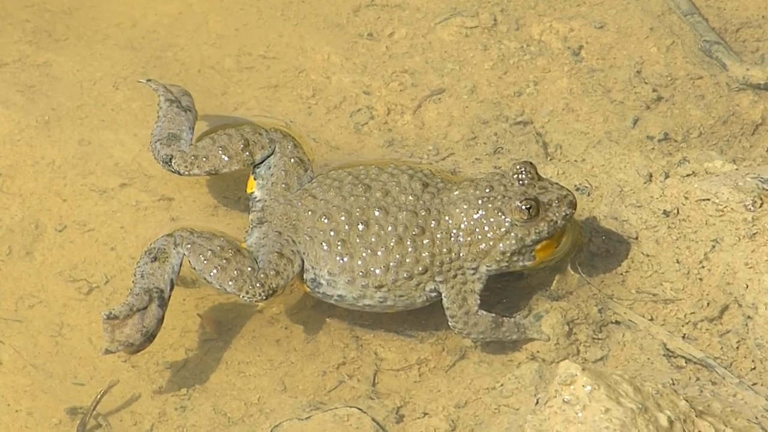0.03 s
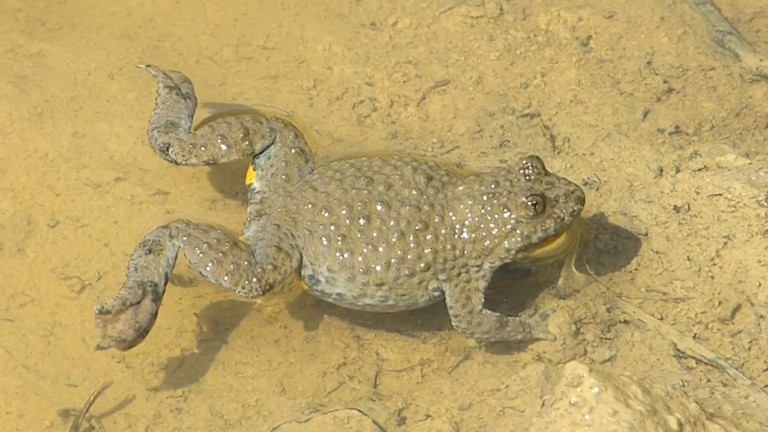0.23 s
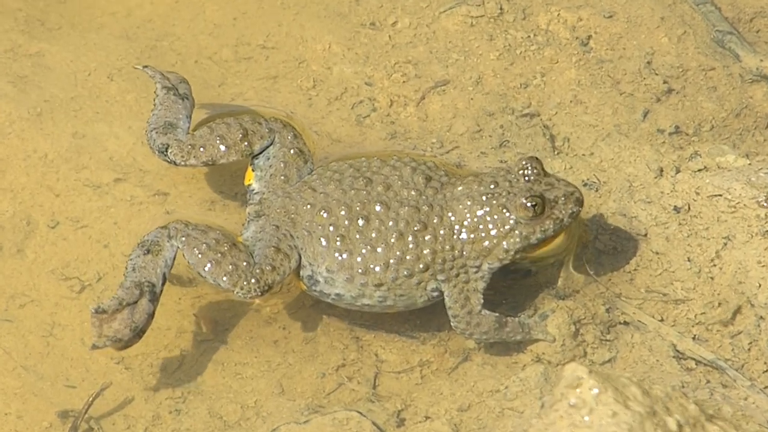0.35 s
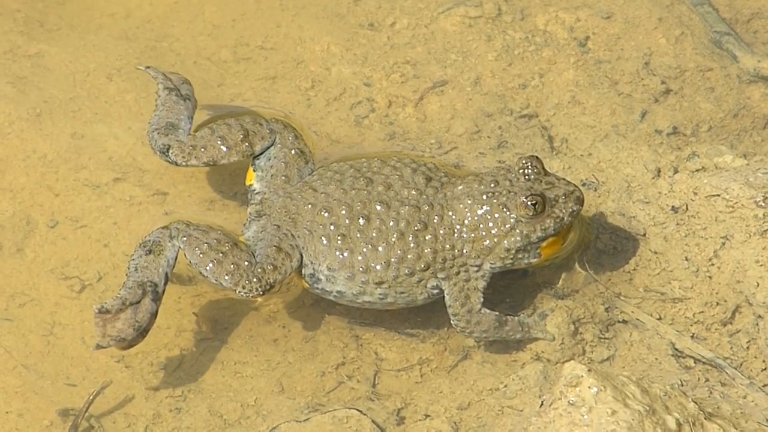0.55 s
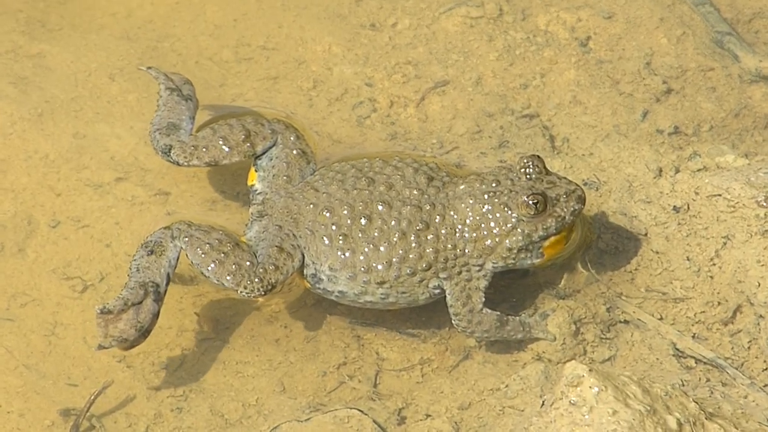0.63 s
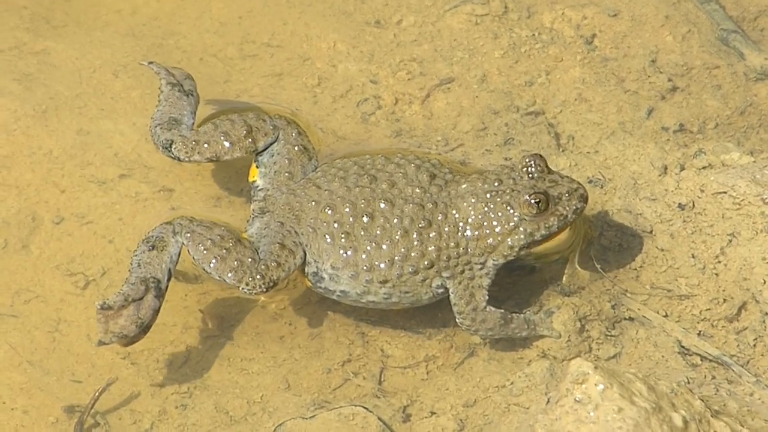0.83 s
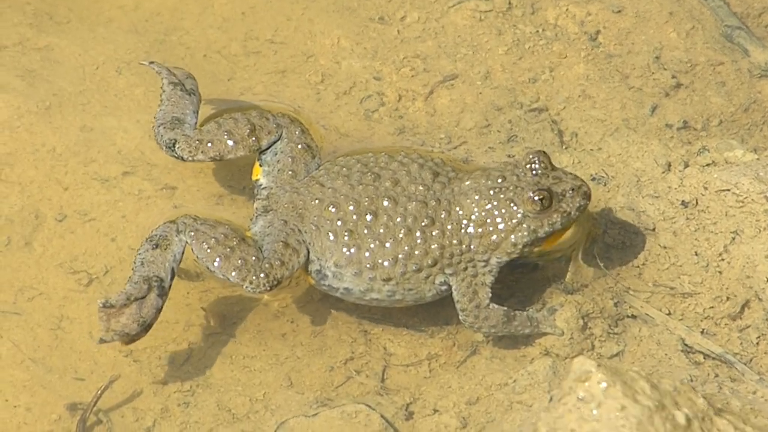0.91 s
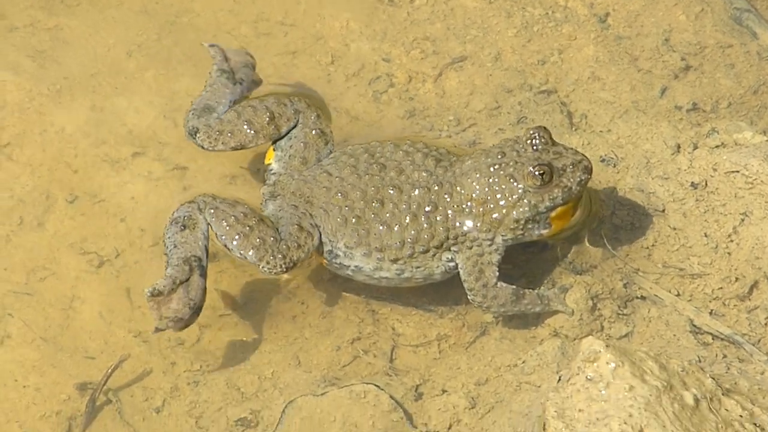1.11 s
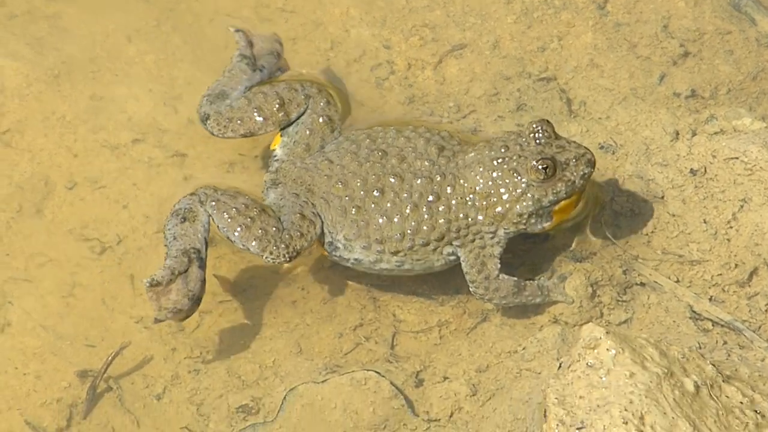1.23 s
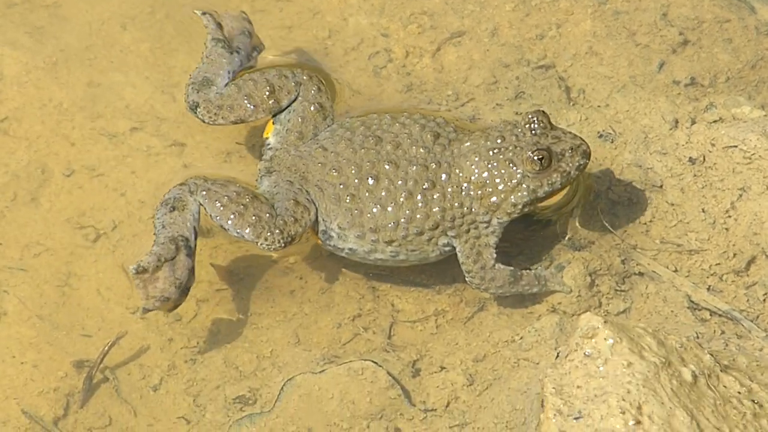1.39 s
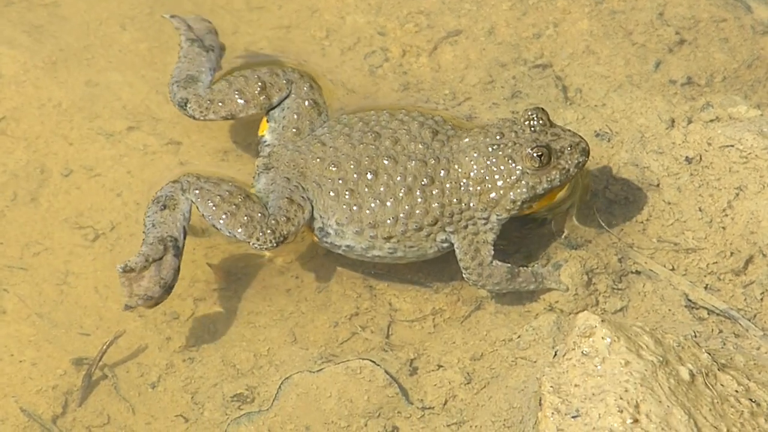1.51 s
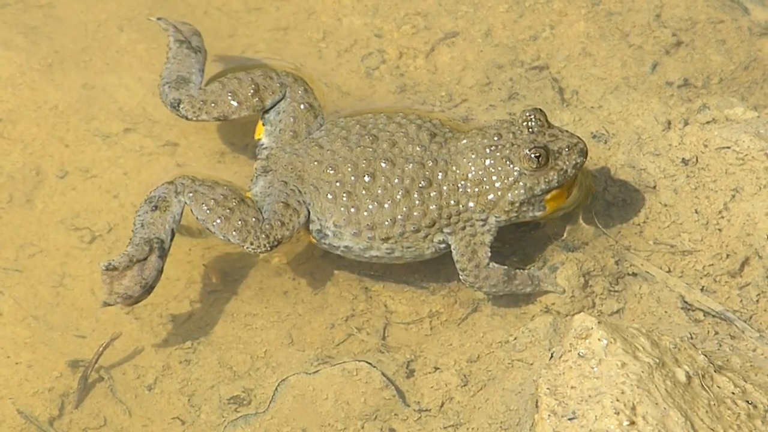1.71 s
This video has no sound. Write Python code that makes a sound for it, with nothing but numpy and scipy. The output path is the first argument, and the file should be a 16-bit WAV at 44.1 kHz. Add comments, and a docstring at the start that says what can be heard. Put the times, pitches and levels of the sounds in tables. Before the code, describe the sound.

A toad in a shallow puddle gives three soft, rounded hoots of about 0.2 seconds, near 0.2, 0.75 and 1.3, each sagging slightly at its end. A tiny bird chirp opens; a faint click at 0.1 and a sharp, ringing one at 0.26 follow, with slight wet rustles. A distant bird buzzes from 0.6, then trills rapidly from 1.0 to about 1.65, over quiet watery outdoor air.

```python
"""Over a quiet outdoor background with a faint wash of water, a small bird farther off chirps at once.
Two sharp clicks, the first much softer, ring short modes close by, among faint rustles of wet hiss.
A toad floating in a shallow puddle gives three soft, nearly pure hoots: gliding sines that rise and sag,
with weak overtones. The bird slurs, buzzes in quick downward sweeps and runs into a trill of arches."""
import sys
import numpy as np
from scipy import signal
from scipy.fft import rfft, irfft
from scipy.io import wavfile
from scipy.ndimage import uniform_filter1d

SR = 44100
rng = np.random.default_rng(int(sys.argv[2]) if len(sys.argv) > 2 else 0)


def digitize_waveform(pressure):
    """Quantize a signal to 16-bit integers and store it at the path in sys.argv[1].

    Rows of a 2-D input are taken as channels; values are limited to [-1, 1].
    """
    field = np.atleast_2d(pressure).T
    bounded = np.clip(field, -1, 1)
    quanta = np.round(bounded * 32767).astype(np.int16)
    wavfile.write(sys.argv[1], SR, quanta)


N = 77175
T = np.arange(N) / SR


def amp(db):
    """Decibels to gain."""
    return 10 ** (np.asarray(db) / 20)


def pan(x, db):
    """Place a sound by its left-right level difference."""
    return x * amp(np.array([[db], [-db]]) / 2)


def walk(rate):
    """Smooth random drift with a spread of 1; a higher rate in Hz moves faster."""
    k = max(int(SR / rate), 1)
    y = uniform_filter1d(uniform_filter1d(rng.standard_normal(N), k), k)
    return y / y.std()


def on_bins(points):
    """A table over frequency, joined on a log axis."""
    hz, value = np.array(points).T
    bins_hz = np.arange(N // 2 + 1) * SR / N
    return np.interp(np.log(bins_hz + 1), np.log(hz), value)


def noise(spectrum, weight=1):
    """Noise of the given density, with an optional weight over frequency."""
    white = rfft(rng.standard_normal(N))
    return irfft(white * amp(on_bins(spectrum)) * weight, N) * np.sqrt(SR / 2)


def curve(table, t):
    """The columns of a table over time, joined by straight lines."""
    times, *columns = np.array(table).T
    return [np.interp(t, times, c) for c in columns]


def gate(table, t):
    """One while a table lasts, with soft edges."""
    inside = (t > table[0][0]) & (t < table[-1][0])
    return uniform_filter1d(1. * inside, size=90)


def tone(hz):
    """A sine of rms 1 that follows a pitch."""
    return np.sqrt(2) * np.sin(2 * np.pi * np.cumsum(hz) / SR)


def ramp(t, length):
    """A quarter-sine rise from 0 to 1."""
    return np.sin(np.pi / 2 * np.clip(t / length, 0, 1))


def echo(x, t60, alike=0):
    """Diffuse reflections from ground and plants: a decaying noise tail with a set left-right likeness."""
    a, b = rng.standard_normal((2, N))
    alike = np.clip(alike, 0, 1)
    tail = a * np.sqrt(1 + alike) + np.array([[1], [-1]]) * b * np.sqrt(1 - alike)
    tail *= np.exp(-np.log(1000) * T / t60)
    tail /= np.sqrt((tail ** 2).sum(1, keepdims=True))
    return signal.fftconvolve(x[None], tail, axes=1)[:, :N]


def background():
    """Distant rumble, a flickering wash of water in the middle and a lightly wavering hiss."""
    # Colour of the outdoor air. Each row: frequency in Hz, density in dB per Hz.
    air_colour = [(20, -102), (60, -96), (100, -94.5), (160, -84.5), (220, -91), (330, -90), (550, -84),
                  (900, -87.5), (1400, -95.5), (2100, -101), (3000, -107), (4800, -102), (7500, -106),
                  (10000, -111), (15500, -116)]
    # Left-right likeness of the air. Each row: frequency in Hz, correlation from -1 to 1.
    likeness = [(60, 0.56), (160, 0.86), (350, -0.22), (900, -0.68), (2000, 0.85), (5000, 0.44),
                (14000, 0.8)]
    WATER_FLICKER_DB, HISS_SWELL_DB, AIR_PAN_DB = 1.3, .6, -1.5
    alike = np.clip(on_bins(likeness), -1, 1)
    mid = noise(air_colour, np.sqrt((1 + alike) / 2))
    side = noise(air_colour, np.sqrt((1 - alike) / 2))
    air = np.array([mid + side, mid - side])

    def below(hz):
        return signal.sosfiltfilt(signal.butter(2, hz, fs=SR, output="sos"), air)

    rumble, body = below(210), below(4200)
    water = (body - rumble) * amp(WATER_FLICKER_DB * walk(52))
    hiss = (air - body) * amp(HISS_SWELL_DB * walk(27))
    return pan(rumble + water + hiss, AIR_PAN_DB)


def chirp():
    """The bird's opening chirp: one sine on a fast, slightly rough pitch path."""
    # Path of the chirp. Each row: time in seconds, pitch in Hz, level in dB.
    path = [(.047, 4650, -50), (.052, 4655, -56), (.056, 4620, -49.5), (.059, 5040, -53),
            (.063, 4280, -57.5), (.066, 3900, -47), (.070, 3570, -57.5), (.080, 3090, -77)]
    hz, db = curve(path, T)
    return tone(hz * (1 + 0.024 * walk(1300))) * amp(db) * gate(path, T)


def clicks():
    """A brief contact cracks and rings short modes, reaching the right side first; a dull scatter follows."""
    # The clicks. Each row: start in seconds, level in dB, left-right difference in dB,
    # scatter level in dB, level of the low modes in dB.
    hits = [(0.1025, -25, 3, 3.5, -11), (.2614, 0, 2, -4, -1.5)]
    # Modes of the clicking thing. Each row: frequency in Hz, level in dB, t60 in seconds,
    # left-right difference in dB.
    modes = [(716, -41, 0.051, 21), (895, -51.5, 0.11, 23), (1152, -22, 0.03, -11.5),
             (1450, -22.5, 0.0088, -9), (1750, -29, 0.028, -5.5), (2375, -24.5, 0.028, 1),
             (2720, -28.5, 0.023, -9.5), (3807, -22.5, 0.0085, 6), (4220, -23, 0.012, -15),
             (5060, -23, 0.014, -5.5), (5840, -17, 0.014, -12.5), (6690, -23, 0.012, -12),
             (8156, -22, 0.018, -8.5), (9500, -25, 0.006, -5)]
    # Colour of the scatter. Each row: frequency in Hz, density in dB per Hz.
    scatter_colour = [(150, -105), (450, -53.5), (850, -58.5), (1300, -56.5), (2000, -68), (2550, -80),
                      (3200, -68), (3900, -62), (7000, -80), (11000, -100), (15500, -103)]
    LOW_MODES_HZ = 2000
    LEFT_LAG_S = .0003
    CONTACT_DB, CONTACT_S = -29, .0012
    CRACK_DB, CRACK_S, CRACK_PAN_DB = -33.5, 0.0024, -13
    SCATTER_T60_S, SCATTER_PAN_DB = 0.051, -4
    out = np.zeros((2, N))
    for start, db, pan_db, scatter_db, low_db in hits:
        ring = np.zeros((2, N))
        for k, (hz, mode_db, t60, side_db) in enumerate(modes):
            level = amp(mode_db + low_db * (hz < LOW_MODES_HZ))
            wave = np.sin(2 * np.pi * hz * T - k * np.pi / 2)  # each mode a quarter turn on
            ring += pan(level * wave * np.exp(-np.log(1000) * T / t60), side_db)
        age = T - start - np.array([[LEFT_LAG_S], [0]])

        def fade(tau):
            return (age >= 0) * np.exp(-np.abs(age) / tau)

        impulse = np.diff(1. * (age >= 0), prepend=0)
        contact = impulse + amp(CONTACT_DB) * rng.standard_normal(N) * fade(CONTACT_S)
        ringing = signal.fftconvolve(contact, ring, axes=1)[:, :N]
        crack = pan(amp(CRACK_DB) * rng.standard_normal((2, N)) * fade(CRACK_S), CRACK_PAN_DB)
        grains = np.array([noise(scatter_colour), noise(scatter_colour)])
        scatter = pan(grains * fade(SCATTER_T60_S / np.log(1000)), SCATTER_PAN_DB)
        out += amp(db) * pan(ringing + crack + amp(scatter_db) * scatter, pan_db)
    return signal.sosfilt(signal.butter(3, [430, 11200], "band", fs=SR, output="sos"), out)


def rustles():
    """Faint, brief swells of wet hiss: coloured noise under bell-shaped envelopes."""
    # The swells. Each row: centre in seconds, half width in seconds, level over the hiss in dB.
    swells = [(0.15, 0.0089, 3), (0.2007, 0.0022, 5.5), (.228, 0.0125, -5), (.49, 0.063, -8),
              (.73, 0.062, -3.5), (.816, 0.0033, 0)]
    # Colour of the hiss. Each row: frequency in Hz, density in dB per Hz.
    hiss_colour = [(1500, -130), (3500, -112), (5200, -103), (8000, -104), (10000, -110), (15500, -122)]
    swell = sum(amp(db) * np.exp(-((T - centre) / width) ** 2) for centre, width, db in swells)
    return pan(swell * noise(hiss_colour), -9)


def toad():
    """Each hoot swells and dies with one push of air; weak overtones hold on into the final fall."""
    # The hoots. Each row: start in seconds, length in seconds, pitch in Hz, level in dB,
    # attack in seconds, release in seconds, power of the attack curve.
    hoots = [(0.197, 0.2, 593.6, -36, 0.1, 0.077, 0.98), (0.741, 0.2, 592.7, -35.8, 0.095, 0.068, 0.98),
             (1.298, 0.19, 587.4, -36, 0.13, 0.037, 0.47)]
    # Overtones of a hoot. Each row: multiple of the pitch, level in dB, delay in seconds,
    # attack in seconds, fade in dB per second.
    partials = [(2, -18.5, .001, .008, 30), (3, -27, .035, .06, 3), (4, -36, .03, .05, 5)]
    SCOOP_HZ, SCOOP_S = 26, .015  # the pitch starts low and settles
    # it sinks as the air runs out, with a last quick fall
    SAG_HZ, SAG_POWER, DROP_HZ, DROP_S = 21, 2.5, 26, .017
    JITTER_HZ, SHIMMER_DB, OVERTONE_SHIMMER_DB = 1.0, .15, .8
    RELEASE_POWER, OVERTONE_RELEASE_POWER = 1.5, .8
    LEFT_LAG_S, TOAD_PAN_DB = .00008, 0.4
    BANK_DELAY_S, BANK_DB = .045, -29  # one reflection off the bank
    TOAD_ECHO_DB, TOAD_ECHO_T60_S = -34, .35
    out = np.zeros(N)
    for start, length, pitch, db, attack, release, power in hoots:
        t = np.clip(T - start, 0, length)
        scoop = SCOOP_HZ * np.exp(-t / SCOOP_S)
        sag = SAG_HZ * (t / length) ** SAG_POWER
        drop = DROP_HZ * np.exp((t - length) / DROP_S)
        hz = pitch - scoop - sag - drop + JITTER_HZ * walk(80)
        ending = ramp(length - t, release)
        hoot = ramp(t, attack) ** power * amp(SHIMMER_DB * walk(42)) * tone(hz)
        overtones = np.zeros(N)
        for k, over_db, delay, rise, fade in partials:
            level = amp(over_db - fade * t + OVERTONE_SHIMMER_DB * walk(130))
            overtones += ramp(t - delay, rise) * level * tone(k * hz)
        out += amp(db) * (ending ** RELEASE_POWER * hoot + ending ** OVERTONE_RELEASE_POWER * overtones)

    def late(seconds):
        return np.interp(T - seconds, T, out)

    direct = pan(np.array([late(LEFT_LAG_S), out]), TOAD_PAN_DB)
    bank = amp(BANK_DB) * late(BANK_DELAY_S)
    return direct + bank + amp(TOAD_ECHO_DB) * echo(out, TOAD_ECHO_T60_S)


def slurs():
    """Single bird notes that slide straight from one pitch to another under a half-sine swell."""
    # The slurs. Each row: start in seconds, length in seconds, from pitch in Hz, to pitch in Hz,
    # level in dB, left-right difference in dB.
    slides = [(0.536, 0.044, 3590, 3950, -65, -7.5), (0.99, 0.0186, 5393, 4066, -52.5, 1)]
    out = np.zeros((2, N))
    for start, length, from_hz, to_hz, db, pan_db in slides:
        u = np.clip((T - start) / length, 0, 1)
        hz = (from_hz + (to_hz - from_hz) * u) * (1 + 0.047 * walk(1360))
        out += pan(tone(hz) * np.sin(np.pi * u) * amp(db), pan_db)
    return out


def buzz():
    """A swelling run of fast, even downward sweeps that widen as it goes."""
    # Course of the buzz. Each row: time in seconds, top pitch in Hz, bottom pitch in Hz, level in dB.
    course = [(.58, 3850, 3300, -81), (.66, 4100, 3194, -65.5), (.76, 4207, 3163, -64),
              (.80, 4360, 3215, -57.5), (.87, 4484, 3310, -58.5), (.92, 4765, 3357, -57.5),
              (.98, 4870, 3348, -58), (1.06, 4850, 3446, -56)]
    RATE_HZ, RATE_JITTER, ROUGH_HZ = 136, .012, 40
    ECHO_DB, ECHO_T60_S, BUZZ_PAN_DB = -5, .3, -7
    top, bottom, db = curve(course, T)
    cycle = np.cumsum(RATE_HZ * (1 + RATE_JITTER * walk(40))) / SR % 1  # 0 to 1 in each sweep
    sweep = tone(top + (bottom - top) * cycle + ROUGH_HZ * walk(700))
    voice = sweep * np.sqrt(np.sin(np.pi * cycle)) * amp(db + walk(100)) * gate(course, T)
    return pan(voice + amp(ECHO_DB) * echo(voice, ECHO_T60_S, alike=0.48), BUZZ_PAN_DB)


def trill():
    """A run of arched notes whose pitch warbles quickly, steadying toward each falling end."""
    # The notes. Each row: start in seconds, level in dB, pitch at the start in Hz,
    # strength of the falling end in dB, height of the arch from 0 to 1.
    notes = [(1.022, -56, 3755, 3.5, 0.99), (1.075, -52, 3730, 2.5, 0.89), (1.134, -53.5, 3733, 4.5, 1),
             (1.191, -49, 3840, -3, 0.81), (1.247, -52, 3793, -1.5, 0.89), (1.306, -52.5, 3883, -0.5, 0.88),
             (1.365, -51.5, 3890, 0.5, 0.87), (1.428, -51.5, 3910, -8.5, 0.81),
             (1.492, -51.5, 3850, -7.5, 0.87), (1.554, -56, 4165, -7, 0.53),
             (1.626, -63.5, 4000, 1.5, 0.37)]
    # Shape of each note. Each row: time from its start in seconds, pitch ratio, level in dB.
    shape = [(0, .96, -12), (.007, 1.18, 0), (.014, 1.28, 0), (.019, 1.48, -10), (.024, 1.55, -12),
             (.029, 1.25, -1), (.035, 1.11, -1.5), (.041, 1.03, -3), (.047, .99, -20)]
    FALL_S = 0.0225  # the falling end begins this long after the start
    WARBLE_RATE_HZ, WARBLE_DEPTH = 140, .13  # depth as a share of pitch, for a full arch
    ROUGH, FLUTTER_DB = .042, 2.0  # roughness as a share of pitch, halved in the falling end
    out = np.zeros(N)
    for start, note_db, pitch, fall_db, arch in notes:
        t = T - start
        ratio, db = curve(shape, t)
        falling = ramp(t - FALL_S, 0.008)
        steadying = 1 - falling / 2
        warble = WARBLE_DEPTH * np.sin(2 * np.pi * (WARBLE_RATE_HZ * t + rng.random()))
        warble *= ramp(ratio - 1, 0.17) * steadying  # only above the starting pitch
        wobble = 1 + arch * warble + ROUGH * steadying * walk(1500)
        loudness = amp(note_db + db + fall_db * falling + FLUTTER_DB * walk(300))
        out += tone(pitch * (1 + arch * (ratio - 1)) * wobble) * loudness * gate(shape, t)
    return out


def song():
    """Chirp and trill blurred by the plants, which scatter a middle band, plus the dry slurs."""
    ECHO_DB, ECHO_T60_S, BIRD_PAN_DB = -1.5, .35, -.6
    opening, run = chirp(), trill()
    plants = signal.butter(2, [4120, 7000], "band", fs=SR, output="sos")
    scattered = signal.sosfilt(plants, run + amp(-8) * opening)
    blur = amp(ECHO_DB) * echo(scattered, ECHO_T60_S, alike=0.82)
    return pan(opening + run + blur, BIRD_PAN_DB) + slurs()


def scene():
    """Toad and clicks in front, bird and background behind."""
    return background() + song() + clicks() + rustles() + toad() + buzz()


def record(dry):
    """The recorder cuts the top with a steep low-pass."""
    return signal.sosfilt(signal.ellip(10, .1, 80, 15800, fs=SR, output="sos"), dry)


dry = scene()
out = record(dry)
digitize_waveform(out)
```